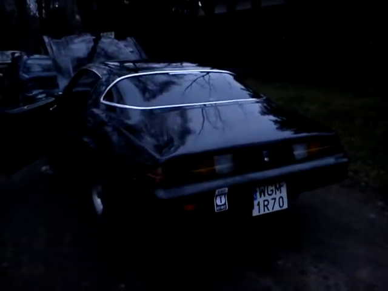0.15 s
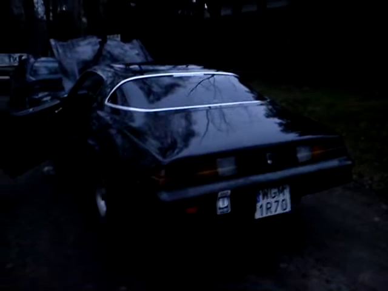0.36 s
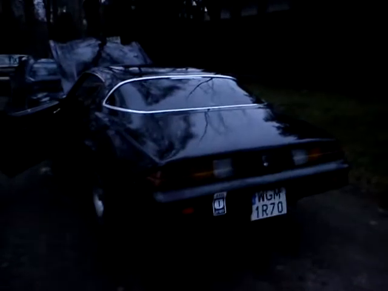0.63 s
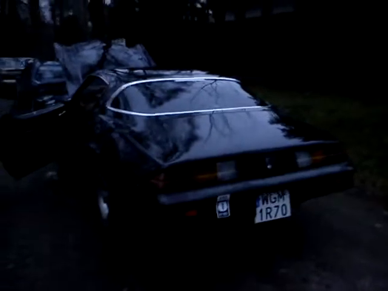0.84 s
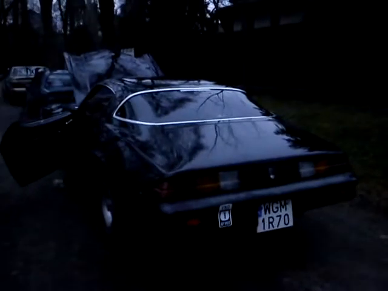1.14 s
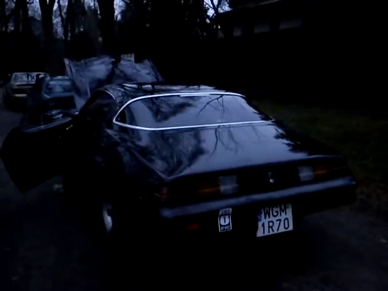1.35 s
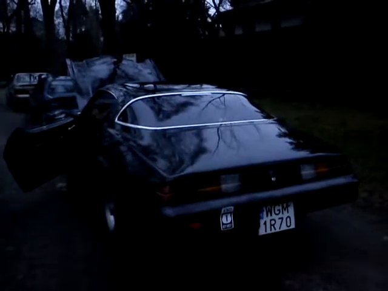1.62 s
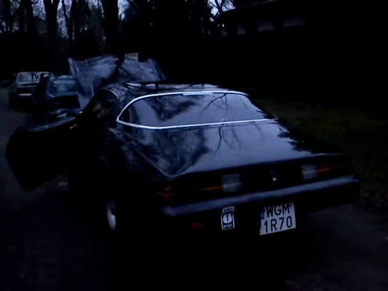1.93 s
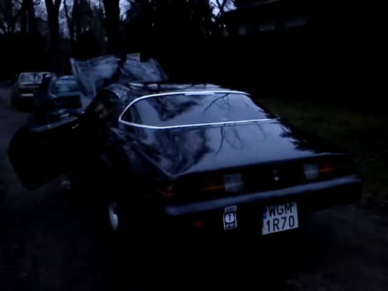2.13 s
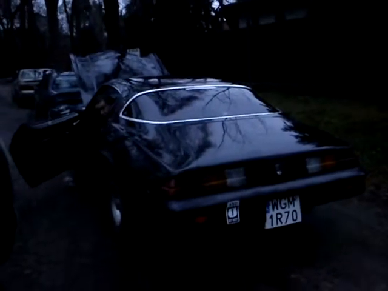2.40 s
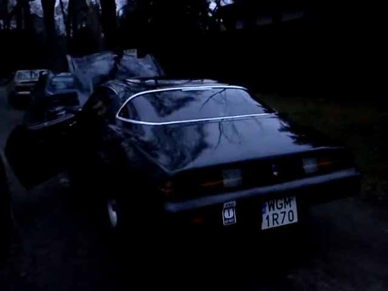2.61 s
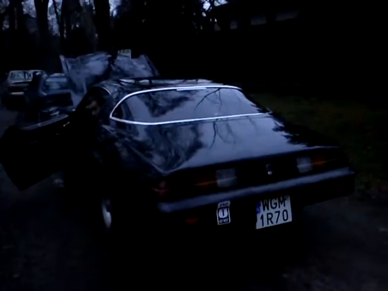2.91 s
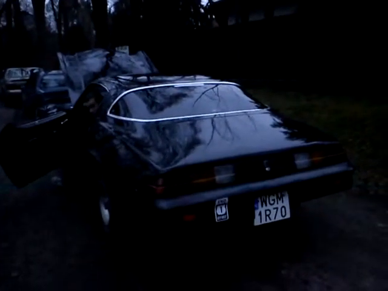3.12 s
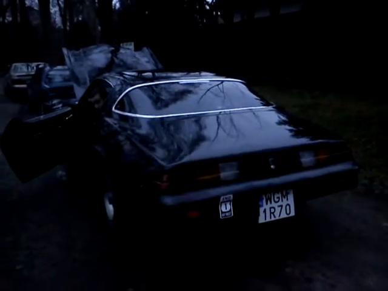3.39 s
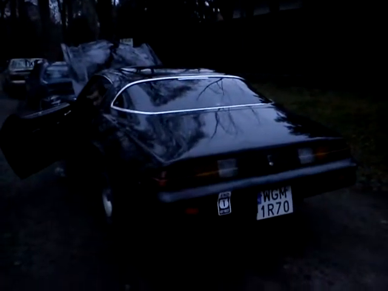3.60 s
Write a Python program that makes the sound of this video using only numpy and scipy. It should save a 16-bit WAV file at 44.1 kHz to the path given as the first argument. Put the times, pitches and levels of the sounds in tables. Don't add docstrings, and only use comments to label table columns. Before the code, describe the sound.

Deep, uneven V8 idle with one sharp exhaust pop, then two rising raspy throttle blips.

```python
import sys
import numpy as np
from scipy import signal
from scipy.fft import rfft, irfft
from scipy.io import wavfile
from scipy.ndimage import uniform_filter1d

SR = 44100
rng = np.random.default_rng(int(sys.argv[2]) if len(sys.argv) > 2 else 0)


def volts(x):
    e = np.asarray(x, float) / 20
    return 10 ** e


def int16_out(signal):
    q = np.round(np.clip(np.atleast_2d(signal).T, -1, 1) * 32767)
    wavfile.write(sys.argv[1], SR, q.astype(np.int16))


N = 165375
LEAD = SR // 4

NEAR_BANK = np.array([1, 0, 1, 1, 0, 1, 0, 0])
# centre_hz, width_hz, level_db
PIPE = [(103.4, 27.5, 4.5), (127.9, 66.6, -13), (177.8, 26, -12), (206.95, 25.7, -10.5),
        (317.3, 10.2, -13.5)]


def level(x, db):
    return x * volts(db) / np.sqrt(np.mean(x ** 2))


def band(x, hz, width):
    return signal.lfilter(*signal.iirpeak(hz, hz / width, fs=SR), x)


def coloured(points):
    hz, db = np.array(points).T
    log_hz = np.log(np.fft.rfftfreq(N, 1 / SR) + 1)
    gain = volts(np.interp(log_hz, np.log(hz), db))
    return level(irfft(rfft(rng.standard_normal(N)) * gain, N), 0)


def walk(rate):
    k = int(SR / rate)
    steps = np.repeat(rng.standard_normal(N // k + 1), k)
    return uniform_filter1d(uniform_filter1d(steps, k), k)[:N]


def engine(t):
    turns, blow_db, rasp_db, boom_db, far_db = throttle()
    pulses = firings(turns, far_db)
    exhaust = exhaust_ring(pulses, blow_db, boom_db)
    return exhaust + exhaust_notes(t, turns[LEAD:]) + bark(pulses, rasp_db) + gas_rasp(turns, rasp_db)


def throttle():
    # start_s, firing_rate_hz, blow_db, gas_rasp_db, silencer_boom_db, far_bank_db
    running = np.array([(0, 38.7, 1.5, 2.5, 6, -1.5), (0.149, 39.37, 2, -1.5, 0.5, -5.5),
                        (0.322, 45.96, 7, 7, -4, -3.5), (0.601, 44.12, 6.5, 2.5, -1, -5),
                        (0.9, 40.13, 2, 3, 3.5, -4), (1.302, 39, 1.5, 0.5, 5, -4),
                        (1.701, 40.03, 2.5, 1.5, 3, -4), (2.398, 40.9, 3, 1.5, 2, -2.5),
                        (2.748, 39.73, 4, 1.5, 2.5, -6.5), (2.811, 50.67, 7.5, 17, 8.5, -5.5),
                        (2.88, 56, 2.5, 22, -6, -4.5), (2.944, 77.3, -11, 21, -10, -1.5),
                        (3.0, 79.7, -7, 15.5, 4, -10.5), (3.119, 70.7, 0, 15.5, 5, -17),
                        (3.17, 78.04, -3, 19.5, -1, -6), (3.25, 116.9, 4.5, 26.5, -12, 7.5),
                        (3.319, 139, -8, 21, -8, -12), (3.399, 127.5, 0.5, 22, -18, -7),
                        (3.551, 113.8, -15.5, 16, -5.5, 1), (3.75, 97.4, -3, 14.5, -7, -3.5)])
    early = np.arange(-LEAD, N) / SR
    hz, *levels_db = [np.interp(early, running[:, 0], running[:, k]) for k in range(1, 6)]
    return np.cumsum(hz) / SR, *levels_db


def firings(turns, far_db):
    cylinders = [0.73, -4.6, -0.66, 0.051, 2.6, -0.42, -3.3, 1.6]
    scatter_db, jitter = 1.3, 0.015
    far_lag_s = 0.004806
    count = np.arange(1, int(turns[-1]))
    near = np.array(NEAR_BANK)[count % 8]
    at = np.searchsorted(turns, count + jitter * rng.standard_normal(len(count)))
    size_db = np.array(cylinders)[count % 8] + scatter_db * rng.standard_normal(len(count))
    size_db = size_db + (1 - near) * far_db[at]
    pulses = np.zeros(2 * N)
    pulses[at + (1 - near) * int(far_lag_s * SR)] = volts(size_db)
    return pulses[:N + LEAD]


def ring(pulses, table):
    out = 0
    for k, (hz, width, db) in enumerate(table):
        out = out + (-1) ** k * volts(db) * band(band(pulses, hz, width), hz, width)
    return out[LEAD:]


def exhaust_ring(pulses, blow_db, boom_db):
    # centre_hz, width_hz, level_db
    boom = [(39, 9.6, -0.5)]
    pipe = ring(pulses * volts(blow_db), PIPE) - ring(pulses * volts(blow_db + boom_db), boom)
    return volts(-24) * pipe / np.std(ring(pulses, PIPE)[SR:2 * SR])


def exhaust_notes(t, turns):
    multiples = np.array([8, 13, 16]) / 8
    # start_s, firing_note_db, bank_note_db, octave_db
    song = np.array([(2.74, -72, -70, -58), (2.81, -24.5, -28, -13), (2.86, -36, -12.5, -36),
                     (2.95, -39, -17.5, -25), (3.1, -26, -19, -30), (3.17, -33, -18.5, -26),
                     (3.212, -13, -23, -25.5), (3.26, -18.5, -13, -19.5), (3.32, -14.5, -30, -26.5),
                     (3.372, -26, -21, -30.5), (3.409, -30.5, -12.5, -30.5), (3.47, -16, -16, -35),
                     (3.551, -15, -20, -18.5), (3.661, -11, -27.5, -17), (3.75, -17, -22.5, -19.5)])
    out = 0
    for k, multiple in enumerate(multiples):
        loudness = volts(np.interp(t, song[:, 0], song[:, k + 1], left=-90))
        out = out + loudness * np.sqrt(2) * np.sin(2 * np.pi * multiple * turns)
    return out


def bark(pulses, rasp_db):
    # centre_hz, width_hz, level_db
    upper_pipe = [(124.5, 95, -5), (194.8, 59, 1), (281.8, 78, -10.5), (527, 74, -15.5), (628, 41, -20.5),
                  (1041, 74, -14.5), (1920, 270, -35.5)]
    return ring(pulses * volts(rasp_db), upper_pipe) * volts(-41) / np.std(ring(pulses, upper_pipe))


def gas_rasp(turns, rasp_db):
    # pitch_hz, level_db (per Hz)
    gas = [(180, -8), (300, -14), (469, -19), (746, -16), (1360, -22), (2100, -22.5), (5900, -40),
           (9090, -49.5), (12000, -43), (15600, -83), (22000, -120)]
    far_puff_db, scatter_db = -7, 2.5
    steady_share, puff_decay = 1.0, 0.92
    crackle_db, crackle_hz = 5, 160
    whole = turns.astype(int)
    puff_db = far_puff_db * (1 - np.array(NEAR_BANK)[whole % 8])
    puff_db = puff_db + scatter_db * rng.standard_normal(400)[whole]
    puff = (volts(puff_db) * np.exp(-(turns - whole) / puff_decay))[LEAD:]
    grain = steady_share + uniform_filter1d(puff, size=40)
    grain = grain * volts(crackle_db * walk(crackle_hz))
    return coloured(gas) * level(grain, -41) * volts(rasp_db[LEAD:])


def exhaust_pop(t):
    pop_s, width_s = 0.214, 0.00026
    u = (t - pop_s) / width_s
    return -volts(-2.5) * (1 - 0.24 * u ** 2) * np.exp(-u ** 2 / 2)


def gulps(t):
    # start_s, attack_s, release_s, level_db, centre_hz
    rushes = [(1.54, 0.083, 0.069, -44.5, 3280), (1.545, 0.059, 0.04, -48.5, 4030),
              (2.417, 0.003, 0.0033, -39.5, 3600), (2.428, 0.0014, 0.0069, -45, 3860),
              (2.476, .005, 0.014, -42.5, 3700), (2.55, 0.027, 0.071, -48, 3700),
              (2.698, .003, 0.016, -43.5, 4900), (2.716, 0.014, 0.058, -30.5, 1341),
              (2.722, .008, 0.028, -42.5, 5500), (2.781, 0.0028, 0.0044, -31, 2600),
              (2.803, 0.0035, 0.011, -23.5, 2200), (2.801, 0.0046, 0.027, -35.5, 5600),
              (2.821, 0.0068, 0.0058, -24, 2020), (2.851, 0.0018, 0.0079, -23.5, 2280),
              (2.853, 0.0023, 0.024, -31, 5150), (2.876, 0.0027, 0.016, -29, 1000),
              (2.903, 0.0039, .01, -30.5, 3000), (2.965, 0.0034, 0.013, -24, 2200),
              (2.932, 0.0023, 0.024, -32.5, 1100), (3.158, 0.0026, 0.011, -22, 1050),
              (3.191, 0.0033, 0.014, -25.5, 2280), (3.215, .003, 0.0083, -39.5, 2260),
              (3.29, 0.032, 0.017, -18.5, 616), (3.249, 0.0017, .006, -41, 1500),
              (3.272, .002, 0.0099, -18, 1287), (3.273, .002, 0.0043, -38, 4900),
              (3.288, 0.0025, 0.015, -22, 2800), (3.311, .002, 0.0064, -15.5, 1380)]
    out = 0
    for s, rise, fall, db, hz in rushes:
        shape = np.exp(-np.where(t < s, ((s - t) / rise) ** 2, (t - s) / fall))
        width = 0.64 * hz
        rush = band(band(rng.standard_normal(N), hz, width), hz, width)
        out = out + shape * level(rush, db)
    return out


def tappets():
    # start_s, peak_db
    ticks = [(0.166, -34), (0.2159, -31), (0.355, -28.5), (0.413, -29), (0.7088, -37), (0.7837, -34.5),
             (0.8286, -28), (0.883, -37), (0.9104, -28.5), (0.978, -40), (1.001, -39), (1.3835, -30),
             (1.5407, -33), (1.71, -38), (1.786, -30.5), (1.916, -35.5), (2.1155, -32.5), (2.1846, -33.5),
             (2.3106, -33), (2.4149, -39), (2.5056, -33), (2.6933, -35)]
    # pitch_hz, level_db, t60_s (time to fade by 60 dB)
    cover = [(1200, -1.5, 0.02), (1500, -1.5, .012), (1837, 16, 0.06), (2510, 10.5, 0.012),
             (3250, 5.5, 0.0099), (3590, -24.5, 0.036), (5200, -31, 0.008)]
    rub_s, spread_db, trim_db = 0.012, 2.5, -1
    out = np.zeros(N)
    u = np.arange(int(0.08 * SR)) / SR
    for s, db in ticks:
        rub = rng.standard_normal(len(u)) * np.exp(-u / rub_s)
        tick = 0
        for hz, ring_db, t60 in cover:
            tint_db = spread_db * rng.standard_normal()
            width = np.log(1000) / np.pi / t60
            tick = tick + volts(ring_db + tint_db) * np.sqrt(t60) * band(rub, hz, width)
        i = int(s * SR)
        out[i:i + len(u)] += tick * volts(db + trim_db) / np.abs(tick).max()
    return out


def rattle():
    centre_hz, width_hz, flicker_db = 1850, 140, 4
    buzz = level(band(rng.standard_normal(N), centre_hz, width_hz), -55.5)
    return buzz * volts(flicker_db * walk(26))


def background_air():
    # pitch_hz, level_db (per Hz)
    hiss = [(180, 0), (300, -3), (455, -8.5), (809, -5.5), (1560, -17), (1830, -16), (6070, -26.5),
            (8630, -44.5), (13700, -57)]
    air_db, flicker_db = -39.5, 2
    return coloured(hiss) * volts(air_db + flicker_db * walk(13.0))


def scene():
    t = np.arange(N) / SR
    mix = engine(t) + exhaust_pop(t) + gulps(t) + tappets() + rattle() + background_air()
    return mix[None]


def roll_off(x):
    return signal.sosfilt(signal.butter(12, 13870, fs=SR, output="sos"), x)


def record(dry):
    clip, dull_hz = 0.55, 7800
    mirror_hz, mirror_db, upper_side_db = 12100, -53, -24.5
    x = clip * np.tanh(dry / clip)
    x = signal.sosfilt(signal.butter(4, dull_hz, fs=SR, output="sos"), x)
    bass = signal.sosfilt(signal.butter(2, 400, fs=SR, output="sos"), x)
    bass = signal.hilbert(bass)
    spin = np.exp(2j * np.pi * mirror_hz * np.arange(N) / SR)
    mirror = volts(mirror_db) * np.real(spin * (np.conj(bass) + volts(upper_side_db) * bass))
    hiss = volts(-66) * rng.standard_normal(x.shape)
    return roll_off(x + mirror + hiss)


dry = scene()
out = record(dry)
int16_out(out)
```